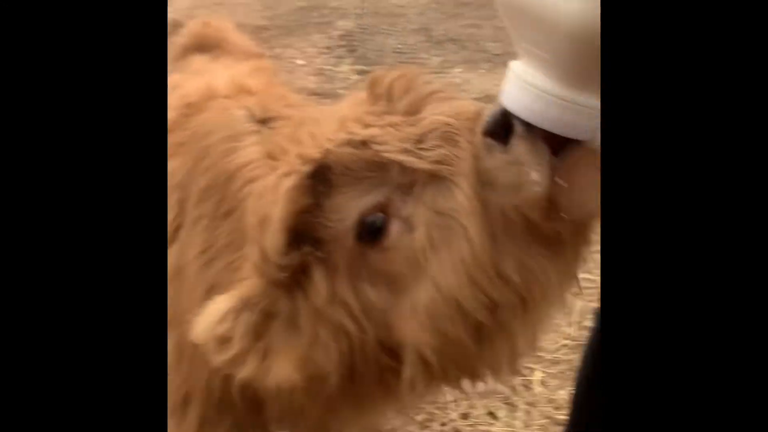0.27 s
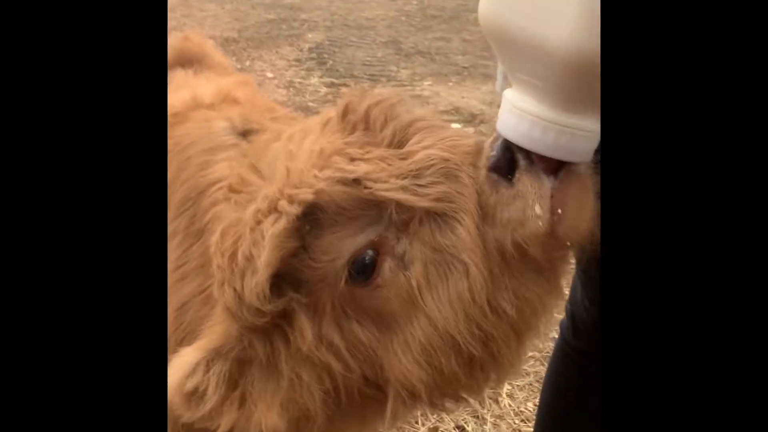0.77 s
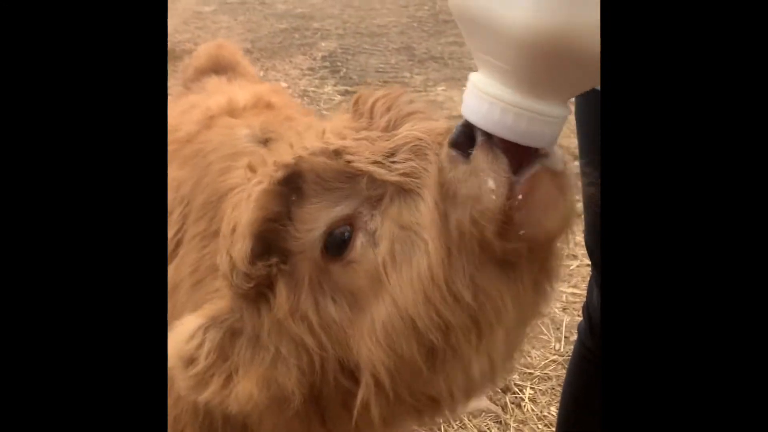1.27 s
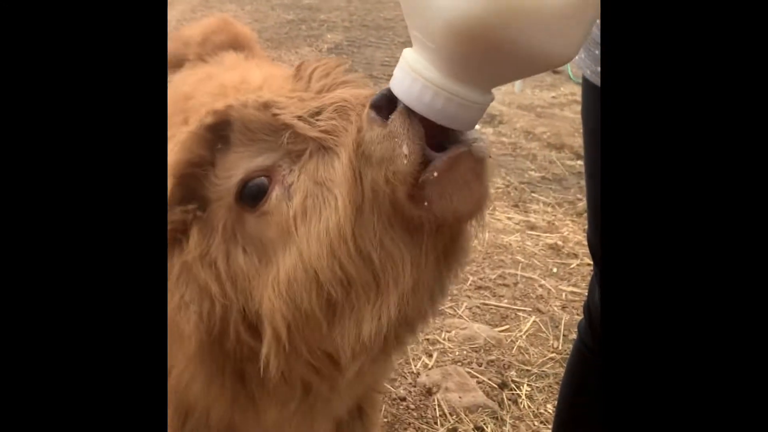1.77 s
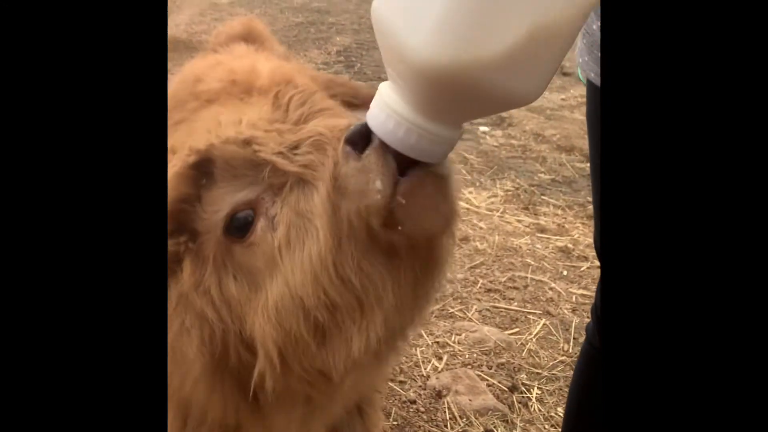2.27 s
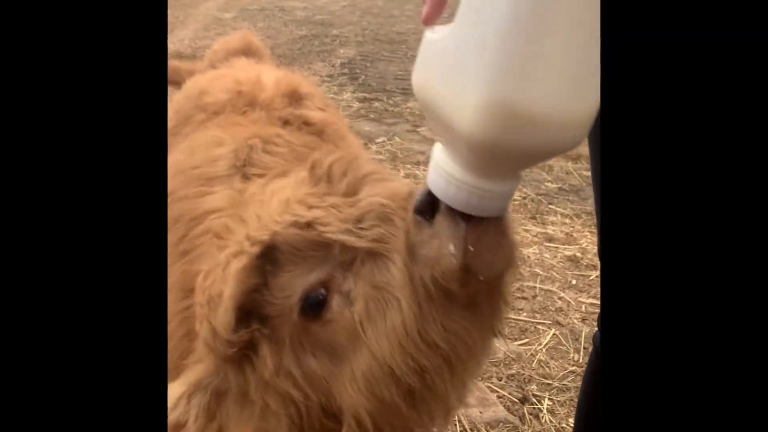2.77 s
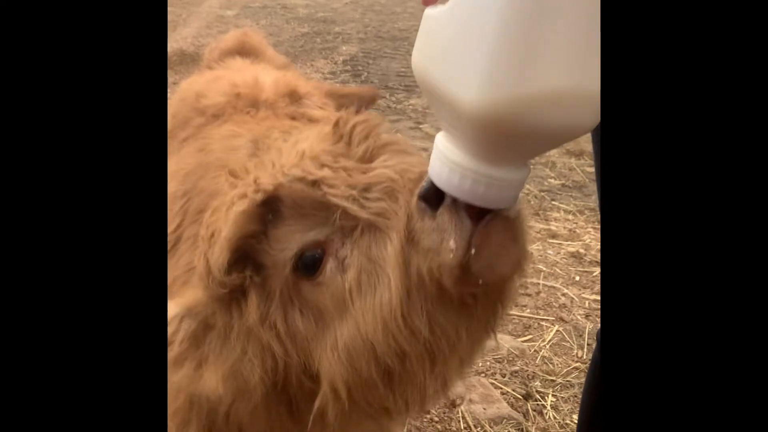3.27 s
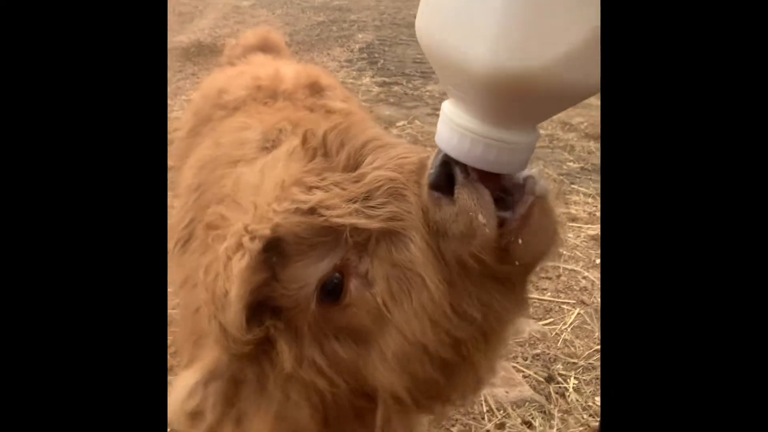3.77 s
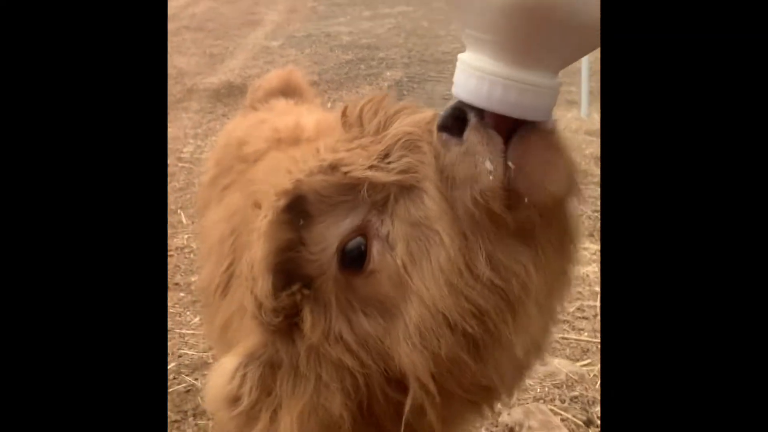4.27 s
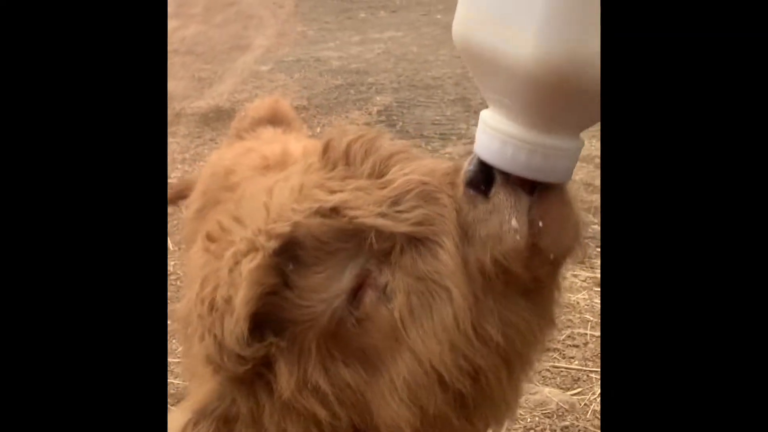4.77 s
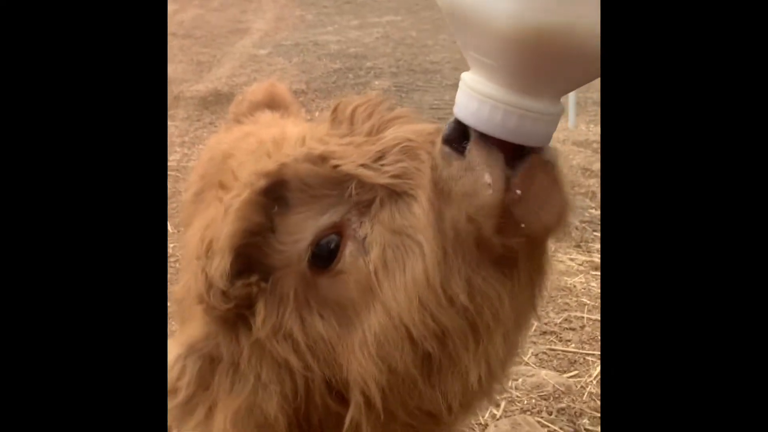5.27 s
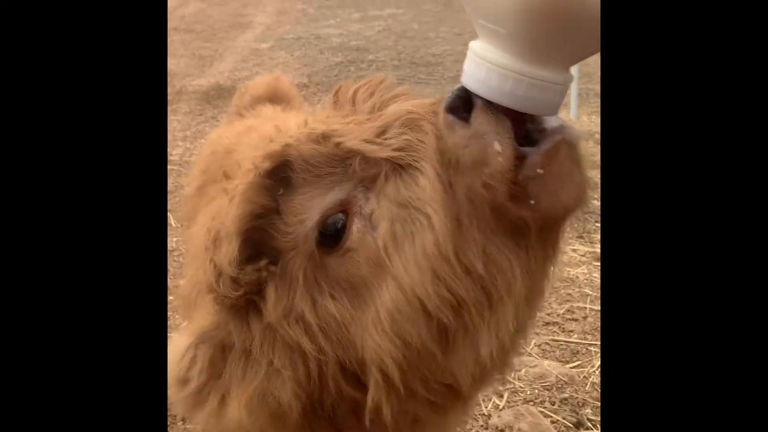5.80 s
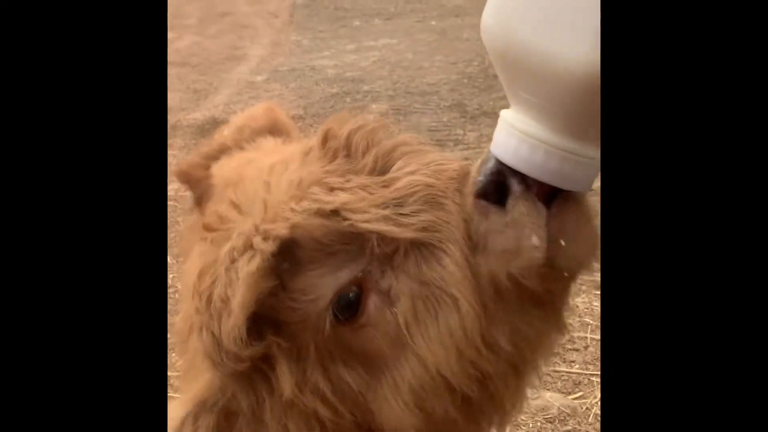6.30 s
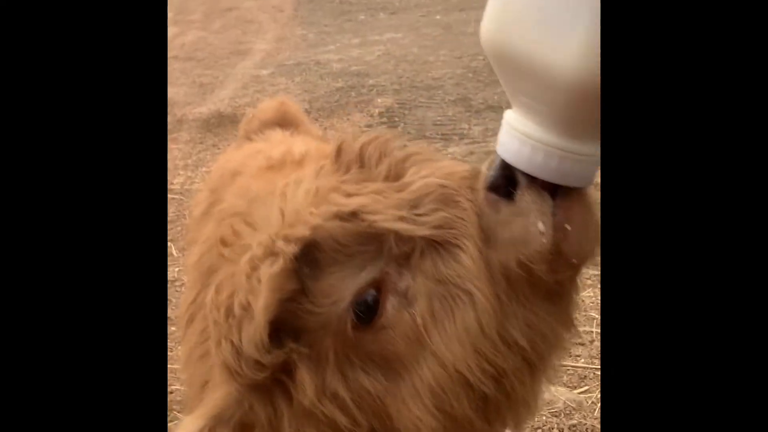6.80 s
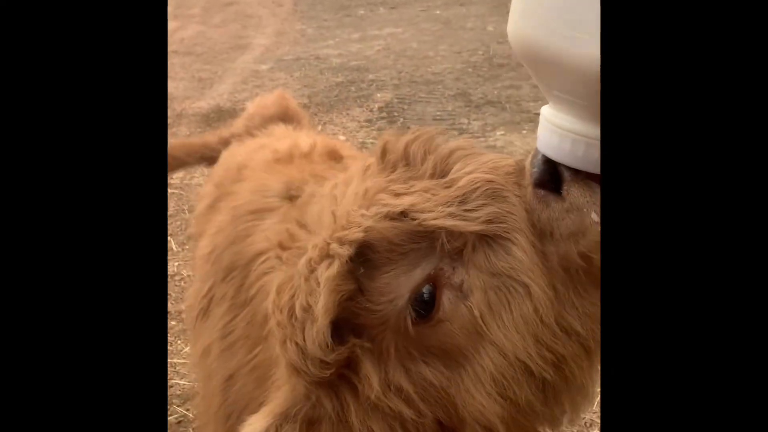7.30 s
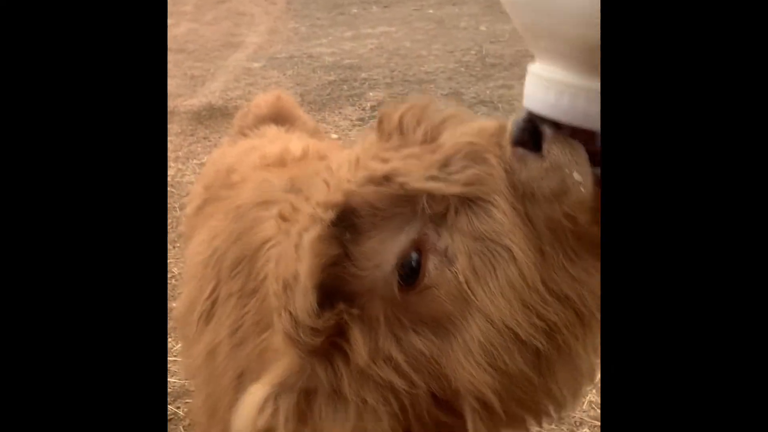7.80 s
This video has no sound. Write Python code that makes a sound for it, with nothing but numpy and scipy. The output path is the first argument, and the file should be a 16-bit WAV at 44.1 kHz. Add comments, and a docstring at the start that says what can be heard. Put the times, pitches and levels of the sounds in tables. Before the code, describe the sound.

A calf sucks milk from a bottle close up, with irregular frothy slurps, fizzing hiss, wet smacks and sharp clicks over faint outdoor wind.

```python
"""Slurps come first: a calf sucks milk from a bottle in an outdoor pen, close to the microphone.
Each suck drags air and froth past the rubber teat: popping froth, fizzing bubbles and a low burble.
Lip gaps whistle as gliding bands of hiss; the seal spits, wet lips smack and films snap as bursts of
froth; milk glugs as falling tones. Wind, open air and a faint hum are filtered noise.
Drifting echoes and a phase-scrambled part join the direct sound at two microphone ports."""
import sys
import numpy as np
from scipy import signal
from scipy.fft import rfft, irfft
from scipy.io import wavfile
from scipy.ndimage import uniform_filter1d

SR = 44100
rng = np.random.default_rng(int(sys.argv[2]) if len(sys.argv) > 2 else 0)


def int16_out(signal):
    """Quantize to a 16-bit WAV file."""
    q = np.round(np.clip(np.atleast_2d(signal).T, -1, 1) * 32767)
    wavfile.write(sys.argv[1], SR, q.astype(np.int16))


N = 355005
TIME = np.arange(N) / SR
TICKS = np.arange(0, N + 128, 128) / SR  # coarse times for slow controls
BINS = np.fft.rfftfreq(N, 1 / SR)


def gain_of(db):
    """Decibels to an amplitude factor."""
    return 10 ** (np.asarray(db) / 20)


def evened(x):
    """Scales to an rms of one."""
    return x / np.sqrt(np.mean(x ** 2) + 1e-20)


def read(points, hz, axis=1):
    """Reads one column of a table on a log-frequency axis."""
    points = np.asarray(points, float)
    return np.interp(np.log(hz + 1), np.log(points[:, 0] + 1), points[:, axis])


def colour_kept(x, points):
    """Filters x by a spectrum without rescaling it."""
    return irfft(rfft(x) * gain_of(read(points, BINS)), N)


def colour(x, points):
    """Filters x by a spectrum; rms one."""
    return evened(colour_kept(x, points))


def bell(hz, centre_hz, octaves):
    """A hump of height one on a log-frequency axis."""
    return np.exp(-.5 * (np.log2((hz + 1) / centre_hz) / octaves) ** 2)


def band_noise(centre_hz, octaves):
    """Noise shaped by a bell; at low rates, a random wander."""
    return irfft(rfft(rng.standard_normal(N)) * bell(BINS, centre_hz, octaves), N)


def add(mix, s, sound):
    """Mixes a sound in at time s."""
    part = mix[max(round(s * SR), 0):][:len(sound)]
    part += sound[:len(part)]


def froth(size, per_s, spread_db, air):
    """Bursting films: sparse clicks of uneven strength, with a share of smooth rushing air."""
    strength = gain_of(spread_db * np.minimum(rng.exponential(1, size), 4))
    sign = rng.choice([-1, 1], size)
    clicks = strength * sign * (rng.random(size) < per_s / SR)
    return evened(evened(clicks) + air * rng.standard_normal(size))


def bubbles(low_hz, high_hz, per_s, ring_cycles, count=20):
    """Bubbles of many sizes, each ringing for a few cycles at its own pitch."""
    t, out = np.arange(2048) / SR, np.zeros(N)
    for hz in np.geomspace(low_hz, high_hz, count):
        cycles = hz * t
        onset = 1 - np.exp(-cycles / 0.36)
        ring_down = np.sin(2 * np.pi * cycles) * np.exp(-cycles / ring_cycles) * onset
        chance = rng.random(N) * SR * count / per_s
        # the rarer a bubble, the stronger, up to a ceiling
        births = np.where(chance < 1, np.maximum(chance, .05) ** -.4, 0)
        out += signal.oaconvolve(births, ring_down)[:N]
    return evened(out)


def burst(length_s, db, centre_hz, octaves, release_s=0.011, attack_s=0.00015, droop=0.47):
    """A short dense crackle of froth, pitched by the size of the opening."""
    size = 8192
    t, hz = np.arange(size) / SR, np.fft.rfftfreq(size, 1 / SR)
    release = np.exp(-np.maximum(t - length_s, 0) / min(release_s, length_s))
    shape = (1 - np.exp(-t / attack_s)) * release
    shape *= np.exp(-droop * t / length_s)  # the pressure behind it drains away
    shape /= np.sqrt(np.mean(shape[t <= length_s] ** 2))
    spray = froth(size, per_s=2100, spread_db=1.5, air=0.65)
    crackle = shape * irfft(rfft(spray) * bell(hz, centre_hz, octaves))
    return gain_of(db) * crackle * np.linalg.norm(shape) / np.linalg.norm(crackle)


def sputter(rate_hz, depth_db):
    """Uneven flow: a gain that wanders at random around the given rate."""
    wander = evened(band_noise(rate_hz, octaves=0.79))
    return evened(gain_of(depth_db * np.clip(wander, -2, 2)))


def films(shape, bands_size, frames_size):
    """Wet films stretch and break, so the colour of the mouth flickers in small patches."""
    patches = uniform_filter1d(rng.standard_normal(shape), bands_size, axis=0)
    return evened(uniform_filter1d(patches, frames_size, axis=1))


def cavity(x, shape_db):
    """Passes x through a moving filter of unit power, given as dB over (Hz, s)."""
    hz, t, z = signal.stft(x, SR, nperseg=256, noverlap=192)
    gain = gain_of(shape_db(hz[:, None], t))
    gain /= np.sqrt(np.mean(gain ** 2, axis=0))
    return signal.istft(z * gain, SR, nperseg=256, noverlap=192)[1][:N]


# sucks, all levels relative: start/s, length/s, rise/s, slurp level/dB, fizz level/dB, swell over stroke/dB,
# leak afterwards/dB, first mouth resonance f/Hz, last mouth resonance f/Hz, flutter depth/dB,
# fizz tilt/(dB/octave), burble level/dB
SUCK_STROKES = [(0.0, 0.38, 0.4, -34.5, -38.5, -20, 2, 2920, 2600, -0.5, 0.5, -48),
                (0.388, 0.25, 0.06, -42, -42.5, 1, -20, 2430, 2550, 0.5, 8.5, -46.5),
                (0.747, 0.1, 0.076, -56, -59, 0, -16, 3000, 3080, 2.5, 5, -55.5),
                (0.848, 0.28, 0.13, -36, -39, -14.5, 0, 3000, 2450, 3, 12, -49),
                (1.213, 0.32, 0.044, -45, -46.5, 6.5, -0.5, 2870, 2970, -0.5, -2, -52.5),
                (1.523, 0.36, 0.11, -40, -42.5, 9, -4, 2620, 2085, 3.5, -8.5, -48.5),
                (2.008, 0.26, 0.069, -48.5, -46.5, 16.5, -3.5, 2860, 3000, 3, -16, -53.5),
                (2.471, 0.21, 0.11, -42.5, -43, -12, -36, 4160, 3070, 3, -20.5, -52.5),
                (2.846, 0.16, 0.026, -56, -54, 16, -25, 2950, 2740, 2, -12, -67),
                (3.02, 0.067, .03, -50.5, -50, 9.5, -1, 3150, 3700, 2.5, -3.5, -49.5),
                (3.167, 0.31, 0.11, -43, -43, 6.5, -3, 2320, 2260, 2.5, -7.5, -48),
                (3.53, 0.38, 0.019, -55, -50.5, 6, 0, 2700, 2900, 3, -13.5, -57),
                (3.944, 0.18, 0.066, -49, -43, 10, -30, 3100, 3120, 3.5, -24.5, -54),
                (4.101, 0.18, 0.039, -35.5, -43, 3, -0.5, 3200, 2700, 3.5, -11.5, -47),
                (4.398, 0.25, 0.07, -37.5, -40.5, -5, -2.5, 2280, 2430, 3, -8, -45.5),
                (4.677, 0.18, 0.037, -54.5, -49, -2, -11, 3300, 3360, 2.5, -12.5, -53),
                (4.827, 0.26, 0.18, -34, -39.5, -5, 0, 3970, 2930, 3.5, -13.5, -47),
                (5.152, 0.33, 0.083, -40.5, -43, 6.5, -1, 1850, 2660, 1.5, -12, -47),
                (5.554, 0.29, 0.12, -39, -41.5, 2.5, -17, 3040, 2350, 2, -10.5, -48.5),
                (6.043, 0.1, 0.034, -55, -54.5, 14, 0, 2900, 3170, 4, -10, -57),
                (6.159, 0.45, 0.084, -44.5, -43, 0.5, 0, 3300, 3440, -0.5, -6, -54.5),
                (6.484, 0.22, 0.05, -37.5, -43, -4, -3, 3750, 3470, 6.5, -18, -45),
                (6.809, 0.27, 0.21, -40.5, -40.5, 0.5, -0.5, 3280, 3380, 2.5, -7.5, -47.5),
                (7.237, 0.42, 0.13, -42, -41.5, -9.5, 0, 3300, 3470, 3, -4.5, -51),
                (7.619, 0.25, 0.17, -37, -38.5, -3.5, -1, 2900, 2940, 3, -2.5, -45.5),
                (7.94, 0.11, 0.03, -45, -50, -3, 0, 3300, 3200, 3, -2, -58)]
SUCK_FIELDS = ("start_s length_s rise_s slurp_db fizz_db swell_db leak_db "
               "first_hz last_hz flutter_db tilt_db burble_db").split()


def column(name):
    """One named column of the sucks."""
    return np.transpose(SUCK_STROKES)[SUCK_FIELDS.index(name)]


def strokes(t, leak_power):
    """Per suck: progress 0-1, attack 0-1, release to a settling leak, and swell in dB."""
    fields = ("start_s", "length_s", "rise_s", "swell_db", "leak_db")
    start, length, rise, swell_db, leak_db = (column(name)[:, None] for name in fields)
    progress = np.clip((t - start) / length, 0, 1)
    after = np.maximum(t - start - length, 0)
    leak = gain_of(leak_power * np.minimum(leak_db, 0))
    # the flow stops quickly; the leak at the lips dies slowly
    release_s, settle_s = 0.021, 0.21
    release = (1 - leak) * np.exp(-after / release_s) + leak * np.exp(-after / settle_s)
    return progress, np.clip((t - start) / rise, 0, 1), release, swell_db * (progress - .5)


def loudness(levels_db, seep_db, attack_power, leak_power, swell_share):
    """Gain of one layer: all sucks at their own levels, over milk seeping steadily."""
    _, attack, release, swell_db = strokes(TICKS, leak_power)
    each = gain_of(levels_db[:, None] + swell_share * swell_db) * attack ** attack_power * release
    return np.interp(TIME, TICKS, np.sqrt((each ** 2).sum(0) + gain_of(seep_db) ** 2))


def posture(t, first, last):
    """A mouth setting slides from first to last in each suck; the next suck takes over."""
    progress, attack, release, _ = strokes(t, leak_power=1)
    weight = (attack * release) ** 2 + 1e-9
    value = first[:, None] + (last - first)[:, None] * progress
    return (weight * value).sum(0) / weight.sum(0)


def flutter(rate_hz=33.02, jitter=0.9):
    """The teat flutters, so milk comes in quick uneven spurts, as deep as each suck makes them."""
    wander = evened(band_noise(16.1, octaves=0.88))
    turns = np.cumsum(rate_hz * (1 + jitter * wander)) / SR
    depth = column("flutter_db")
    depth_db = np.interp(TIME, TICKS, posture(TICKS, depth, depth))
    return evened(gain_of(depth_db * np.cos(2 * np.pi * turns)))


# slurp colour: f/Hz, relative level/dB
SLURP_COLOUR = [(1100, -9), (1550, 5), (1850, 6), (2300, 4), (2650, -4), (3200, 7), (3700, 6), (4200, -31),
                (4700, -37), (5500, -8)]


def slurp(flow, spurts, bubbly=0.26, films_db=1.7):
    """Froth and small bubbles pop in the mouth, whose resonance slides as the tongue strips the teat."""
    def mouth(hz, t):
        flicker_db = films_db * films((len(hz), len(t)), bands_size=2, frames_size=9)
        resonance_hz = posture(t, column("first_hz"), column("last_hz"))
        return read(SLURP_COLOUR, hz) + 12 * bell(hz, resonance_hz, octaves=0.3) + flicker_db
    pops = froth(N, per_s=1100, spread_db=2.7, air=0.5)
    pops = pops + bubbly * bubbles(1656, 3962, per_s=350, ring_cycles=26)
    level = loudness(column("slurp_db"), seep_db=-69, attack_power=1.3, leak_power=4.3, swell_share=1.0)
    uneven = flow * spurts * sputter(rate_hz=160, depth_db=1.5)
    return evened(cavity(pops, mouth)) * gain_of(-4.5) * level * uneven


# fizz colour: f/Hz, relative level/dB
FIZZ_COLOUR = [(2800, -24), (4200, -72), (4800, 2.5), (5500, -2), (6300, -2), (7200, 1), (8400, 2),
               (10000, 3.5), (11000, 4.5), (12000, 3), (13000, 4.5), (14000, 5), (15700, -7.5)]
# narrow hollow in the hiss, drifting as the head moves: t/s, f/Hz
HISS_HOLLOW = [(0.5, 6300), (1.3, 7140), (1.7, 7900), (2.1, 8200), (2.8, 7000), (3.6, 7040), (4.1, 6600),
               (4.75, 7700), (5.6, 6700), (6.4, 7800), (7.4, 7640), (8, 7250)]
# boost of the highest hiss: t/s, relative level/dB
TOP_HISS_LEVEL = [(0, 3.5), (1, -5), (1.7, 7), (2.3, 7), (3, -4.5), (3.7, 11.5), (4.6, 7.5), (5.5, -5),
                  (6.2, -9), (8, -16)]


def fizz(flow, bubbly=0.21, films_db=1.9, hollow_db=-11, hollow_octaves=0.026):
    """Tiny bubbles ring and air hisses through the gap between lip and teat, in little clumps."""
    def gap(hz, t):
        tilt = column("tilt_db")
        tilt_db = posture(t, tilt, tilt) * np.log2(np.maximum(hz, 4000) / 9000)
        hollow_hz = np.interp(t, *np.transpose(HISS_HOLLOW))
        notch_db = hollow_db * bell(hz, hollow_hz, hollow_octaves)
        top_db = np.interp(t, *np.transpose(TOP_HISS_LEVEL)) * bell(hz, 14500, octaves=0.28)
        flicker_db = films_db * films((len(hz), len(t)), bands_size=4, frames_size=14)
        return read(FIZZ_COLOUR, hz) + tilt_db + top_db + notch_db + flicker_db
    spray = froth(N, per_s=1500, spread_db=5.5, air=0.95)
    spray = spray + bubbly * bubbles(5733, 12100, per_s=600, ring_cycles=30)
    level = loudness(column("fizz_db"), seep_db=-60.5, attack_power=0.49, leak_power=0.62, swell_share=0.45)
    uneven = evened(flow ** 0.5) * sputter(rate_hz=170, depth_db=0.5)
    return cavity(evened(spray), gap) * gain_of(-2.05) * level * uneven


# burble colour: f/Hz, relative level/dB
BURBLE_COLOUR = [(200, 0), (370, -14), (500, -9.5), (700, -1.5), (950, 1), (1200, -1), (1500, -3.5),
                 (2200, -35)]


def burble(flow, frothy=0.52):
    """Larger bubbles ring deep in the mouth among bursting froth, in uneven clumps."""
    level = loudness(column("burble_db"), seep_db=-54, attack_power=0.46, leak_power=10.5, swell_share=1.0)
    clumps = sputter(rate_hz=18.4, depth_db=1.9)
    pops = froth(N, per_s=450, spread_db=2.5, air=0.2)
    pops = evened(irfft(rfft(pops) * bell(BINS, 920, octaves=0.85), N))
    wet = bubbles(383.0, 1457, per_s=800, ring_cycles=9.8) + frothy * pops
    return colour(wet, BURBLE_COLOUR) * gain_of(-2.0) * level * clumps * flow


# wind rumble colour: f/Hz, relative level/dB
WIND_RUMBLE = [(15, -66), (30, -17), (48, -7.5), (66, 2.5), (100, -6.5), (145, -5), (180, -12),
               (260, -15.5), (450, -32.5), (900, -62)]
# gusts that buffet the microphone: t/s, length/s, relative level/dB
WIND_GUSTS = [(0.058, 0.16, -42), (2.367, 0.044, -29), (2.405, 0.068, -33.5), (2.456, 0.13, -42),
              (5.306, 0.032, -44), (7.974, 0.062, -43.5)]


def wind():
    """Low, lumpy turbulence at the microphone, with brief stronger gusts."""
    rumble = colour(rng.standard_normal(N), WIND_RUMBLE)
    out = rumble * gain_of(-51) * sputter(rate_hz=5.2, depth_db=2.5)
    buffet = band_noise(64, octaves=0.71)
    for s, length_s, db in WIND_GUSTS:
        gust = buffet[(TIME >= s) & (TIME < s + length_s)]
        add(out, s, gain_of(db) * evened(gust) * signal.windows.tukey(len(gust), .3))
    return out


# open-air colour: f/Hz, relative level/dB
OPEN_AIR = [(25, -21), (100, -13), (280, 2), (370, 13), (450, -19), (800, -27), (1200, -21), (1550, -7),
            (3000, -16.5), (4000, -15), (5200, -28), (7000, -38), (10500, -4.5), (16000, -13)]
# faint, far, wavering hum: f/Hz, width/octaves, relative level/dB
FAR_HUM = [(372.3, 0.024, -66.5), (1270, 0.029, -73)]


def outdoors():
    """The wind, the faint wash of the open pen and a far hum of narrow noise bands."""
    noise = rfft(rng.standard_normal(N))
    hum = np.zeros(N)
    for hz, octaves, db in FAR_HUM:
        hum += gain_of(db) * evened(irfft(noise * bell(BINS, hz, octaves), N))
    return wind() + hum + gain_of(-59.5) * colour(rng.standard_normal(N), OPEN_AIR)


# breathy whistles at the lip gap: t/s, length/s, relative level/dB, first f/Hz, last f/Hz
LIP_WHISTLES = [(0.02, 0.086, -64, 8140, 10600), (0.222, 0.18, -49.5, 10700, 8460),
                (0.396, 0.32, -52, 8060, 8260), (0.814, 0.078, -57, 8000, 10400),
                (1.056, 0.24, -50, 10500, 9200), (2.05, 0.2, -51, 7000, 9600),
                (4.27, 0.25, -50.5, 11400, 9950), (4.806, 0.083, -52.5, 7260, 11100),
                (5.241, 0.18, -50, 7600, 9900), (5.48, 0.13, -55, 7800, 7370),
                (6.435, 0.32, -45.5, 8680, 8950)]


def whistles(width_hz=520):
    """A narrow band of hiss glides as the lip gap narrows or widens, swelling and fading."""
    out = np.zeros(N)
    lowpass = 1 / (1 + (BINS / width_hz) ** 4) ** .5
    air = evened(irfft(rfft(rng.standard_normal((2, N))) * lowpass, N))
    for s, length_s, db, first_hz, last_hz in LIP_WHISTLES:
        a, b = air[:, (TIME >= s) & (TIME < s + length_s)]
        turn = 2 * np.pi * np.cumsum(np.geomspace(first_hz, last_hz, len(a))) / SR
        hiss = a * np.cos(turn) + b * np.sin(turn)
        add(out, s, gain_of(db) * signal.windows.tukey(len(a), .7) * hiss)
    return out


# hollow notes of mouth and bottle: f/Hz, relative level/dB, t60/s
RING_NOTES = [(947, -3, 0.09), (1370, 1, 0.097), (2350, 0, 0.11), (2360, -13, 0.044), (2534, -14, 0.05),
              (2840, -2, 0.081), (3220, -10, 0.073), (3560, -2, 0.088), (3830, -10, 0.099)]


def ring():
    """The hollow notes, struck once and dying away."""
    t, out = np.arange(8192) / SR, np.zeros(8192)
    for hz, db, t60_s in RING_NOTES:
        out += gain_of(db - 60 * t / t60_s) * np.sin(2 * np.pi * (hz * t + rng.random()))
    return out


# seal bursts on the teat, levels relative: t/s, length/s, spray level/dB, snap delay/s, snap level/dB,
# mouth level/dB, throat level/dB, ring level/dB
SEAL_SPITS = [(0.2155, 0.0084, -28, 0.0012, -36, -42, -51, -52),
              (1.41, 0.01, -29.5, 0.0043, -18, -33, -43.5, -39),
              (2.996, 0.025, -22, 0.017, -13, -31, -31, -24)]


def spits(mouth_lag_s=0.001933, throat_lag_s=0.009, snap_s=0.0008, throat_s=0.03):
    """The seal bursts: overlapping spray, mouth and throat bursts, and a sharp snap that rings notes."""
    out = np.zeros(N)
    for s, length_s, spray_db, snap_delay_s, snap_db, mouth_db, throat_db, ring_db in SEAL_SPITS:
        spray = burst(length_s, spray_db, centre_hz=11030, octaves=0.68, attack_s=0.00086, droop=0.55)
        mouth = burst(length_s, mouth_db, centre_hz=2650, octaves=0.46, attack_s=0.00065, droop=0.099)
        add(out, s, spray)
        add(out, s + snap_delay_s, burst(snap_s, snap_db, centre_hz=9800, octaves=0.26))
        add(out, s + snap_delay_s, gain_of(ring_db) * ring())
        add(out, s + mouth_lag_s, mouth)
        add(out, s + throat_lag_s, burst(throat_s, throat_db, centre_hz=1080, octaves=0.68))
    return out


# wet smacks of lips and tongue: t/s, length/s, relative level/dB, centre f/Hz, width/octaves
LIP_SMACKS = [(0.237, 0.072, -45, 2260, 0.27), (0.242, 0.029, -44, 894, 0.06),
              (0.652, 0.0076, -44, 8400, 1.2), (0.686, 0.0083, -48, 1460, 0.75),
              (1.2195, 0.014, -42, 594, 1), (1.448, 0.013, -47, 9730, 0.27),
              (2.271, 0.01, -36.5, 1680, 0.23), (3.01, 0.0071, -29, 2650, 0.28),
              (3.027, 0.012, -38, 1180, 1.5), (3.071, 0.016, -45, 1430, 1.1),
              (3.573, 0.019, -37, 670, 1.04), (3.765, 0.011, -43.5, 2630, 0.76),
              (3.779, 0.0087, -43, 810, 0.53), (3.782, 0.0091, -40.5, 2590, 0.56),
              (3.828, 0.0046, -38.5, 2330, 0.69), (3.844, 0.007, -36, 1370, 1.46),
              (4.047, 0.018, -43, 890, 0.19), (4.244, 0.008, -41.5, 8430, 0.81),
              (4.653, 0.013, -42, 740, 0.53), (4.824, 0.0029, -46.5, 2360, 0.16),
              (4.863, 0.0029, -41, 900, 0.91), (4.904, 0.008, -36.5, 1190, 0.72),
              (4.925, 0.024, -42.5, 3730, 0.1), (5.376, 0.021, -33, 1940, 0.35),
              (5.3772, 0.022, -37.5, 8000, 0.98), (5.688, 0.0064, -35.5, 1070, 0.96),
              (5.876, 0.018, -45.5, 2090, 0.27), (5.978, 0.0027, -39.5, 2000, 1.6),
              (6.243, 0.0095, -46, 800, 0.6), (6.2735, 0.0084, -37, 1090, 0.46),
              (6.534, 0.039, -36, 1870, 0.37), (6.6, 0.0056, -42, 764, 0.13),
              (6.703, 0.0095, -41, 2140, 2.4), (7.843, 0.014, -44, 2170, 0.33)]
# milk films snapping between lip and teat: t/s, relative level/dB, centre f/Hz
FILM_SNAPS = [(0.6833, -46, 9000), (0.7092, -44, 9500), (0.7225, -47, 9000), (0.7385, -59, 9000),
              (0.7516, -43, 9000), (0.8175, -45, 8500), (0.848, -43, 8500), (1.4545, -40, 9600),
              (1.463, -40, 9500), (1.5295, -41, 9500), (2.0604, -41, 9000), (2.6725, -41, 9700),
              (2.989, -40, 2600), (3.0845, -38, 10500), (4.1554, -42, 3100), (4.2008, -41, 2700),
              (4.2145, -35, 2400), (4.346, -33.5, 2600), (4.4051, -37, 2660), (4.4385, -38, 2600),
              (4.4926, -50, 3200), (5.6814, -37, 8500), (5.7587, -33, 2600), (6.053, -38, 9200),
              (6.1985, -35, 8500), (6.6322, -41, 2600), (6.8814, -45, 8500), (7.047, -33.5, 8500),
              (7.3361, -43, 8500), (7.7983, -38, 8660), (7.813, -31, 8500), (7.8494, -31, 8000)]


def smacks():
    """Lips and tongue part: one burst of froth each; a single film gives just a snap."""
    out = np.zeros(N)
    for s, length_s, db, centre_hz, octaves in LIP_SMACKS:
        add(out, s, burst(length_s, db, centre_hz, octaves))
    for s, db, centre_hz in FILM_SNAPS:
        add(out, s, burst(0.001, db, centre_hz, octaves=0.5))
    return out


def pocket(db, fall_s, final_hz, decay_s, extra_hz=2900, steepness=2.15, swell_s=0.003):
    """A pocket of air opens in the milk: its tone drops as it swells, and soon dies."""
    t = np.arange(4096) / SR
    hz = final_hz + extra_hz / (1 + (t / fall_s) ** steepness)
    size = np.minimum(t / swell_s, 1) * np.exp(-np.maximum(t - swell_s, 0) / decay_s)
    return gain_of(db) * size * np.sin(2 * np.pi * np.cumsum(hz) / SR)


# glugs, before the throat: t/s, relative peak level/dB, fall/s, ring decay/s
MILK_GLUGS = [(4.7108, -31.5, 0.0014, 0.0029), (4.7375, -33, 0.00115, 0.0035),
              (5.979, -31.5, 0.00147, 0.0049), (5.9968, -34, 0.0016, 0.0083), (6.0157, -36, 0.00144, 0.005),
              (6.0725, -42, 0.0012, 0.003), (6.093, -36.5, 0.0013, 0.0057), (6.1165, -36.5, 0.0013, 0.0057),
              (6.137, -39, 0.00112, 0.004), (6.211, -38, 0.00132, 0.005), (6.2235, -39, 0.00096, 0.0035),
              (7.5503, -33, 0.00115, 0.0023), (7.578, -35, 0.00104, 0.002),
              (7.5962, -33.5, 0.00102, 0.0022), (7.6102, -40, 0.00108, 0.0017), (7.627, -40, 0.0008, 0.002),
              (7.9381, -31.5, 0.00091, 0.0015), (7.9459, -32, 0.00085, 0.0022),
              (7.969, -30.5, 0.00082, 0.0015), (7.9805, -33, 0.0008, 0.0016), (7.99, -49, 0.0008, 0.0016)]
# large bubbles with a hollow note, before the throat: t/s, relative peak level/dB
HOLLOW_BLOOPS = [(1.2186, -36), (3.022, -36), (3.575, -43.5)]
# throat through which both are heard: f/Hz, gain/dB
THROAT_COLOUR = [(150, 4), (300, -0.5), (450, -0.5), (620, 5), (850, -11), (1200, 11.5), (1600, 5.5),
                 (3000, -4)]


def glugs(drop_power=0.39, pocket_fall_s=0.0014, pocket_hz=185):
    """Runs of short glugs, ending lower the slower they fall, and a few hollow bloops."""
    out = np.zeros(N)
    for s, db, fall_s, ring_s in MILK_GLUGS:
        final_hz = pocket_hz * (pocket_fall_s / fall_s) ** drop_power
        add(out, s, pocket(db, fall_s, final_hz, ring_s))
    for s, db in HOLLOW_BLOOPS:
        add(out, s, pocket(db, fall_s=0.001056, final_hz=270, decay_s=0.024))
    return colour_kept(out, THROAT_COLOUR)


# near reflections, likely bottle, ground and legs: delay/s, relative level/dB, rms drift/s
NEAR_ECHOES = [(.0011, -12, 0.00013), (.00375, -19, 0.00015), (.0062, -11.5, 0.0003)]
# their colour: f/Hz, gain/dB
REFLECTION_COLOUR = [(300, -29.5), (2000, -4), (4000, -1), (8000, -3), (15000, -12)]


def echoes(x, rate_hz=1.346):
    """Thin, bright early reflections whose paths drift as the calf moves its head."""
    thin, out = colour_kept(x, REFLECTION_COLOUR), np.zeros(N)
    for delay_s, db, drift_s in NEAR_ECHOES:
        drift = evened(band_noise(rate_hz, octaves=0.483))
        out += gain_of(db) * np.interp(TIME - delay_s - drift_s * drift, TIME, thin, left=0)
    return out


def scatter(x):
    """Reflections from the moving head and bottle keep the loudness but scramble the phase."""
    z = signal.stft(x, SR, nperseg=128)[2]
    turned = z * np.exp(2j * np.pi * rng.random(z.shape))
    mixed = signal.istft(turned, SR, nperseg=128)[1][:N]
    return evened(mixed) * np.std(x)


# microphone ports: f/Hz, phase of left against right/rad, likeness/(0-1), left minus right/dB
MIC_PORTS = [(30, 0, .96, 0), (110, -.05, .96, .5), (350, -.45, .84, 3), (650, -1.65, .88, 0),
             (950, -1.5, .96, -2.5), (1550, -3.05, .98, 0), (1950, -4.6, .6, -5), (2350, -5.1, .5, -6),
             (2750, -7, .55, 0), (3250, -7.6, .75, -7), (3900, -9.3, .996, 0), (4900, -9.5, .996, 0),
             (6200, -10.7, .86, 0), (8200, -12.55, .96, 0), (10500, -13.9, .87, 0), (12600, -15.65, .99, 0),
             (13500, -15.8, .99, 0), (15700, -18.3, .65, 0)]


def ports(direct, diffuse):
    """Sound from the right reaches the left port later, mixed there with a diffuse part."""
    phase, same, balance_db = (read(MIC_PORTS, BINS, axis=k) for k in (1, 2, 3))
    same, right, balance = np.clip(same, 0, 1), rfft(direct), gain_of(balance_db)
    shared = same * right * np.exp(1j * phase)
    left = (shared + np.sqrt(1 - same ** 2) * rfft(diffuse)) * balance
    return irfft(np.array([left, right]) / np.sqrt((1 + balance ** 2) / 2), N)


def scene():
    """The calf's mouth and its reflections over the wind and the open air."""
    flow, spurts = sputter(rate_hz=11.8, depth_db=0.5), flutter()
    sucking = slurp(flow, spurts) + fizz(flow * spurts) + burble(flow * spurts)
    mouth = sucking + whistles() + spits() + smacks() + glugs()
    diffuse = gain_of(-8.0) * scatter(mouth) + gain_of(11.5) * echoes(mouth)
    direct = gain_of(-0.75) * (mouth + echoes(mouth))
    return ports(direct + outdoors(), diffuse + outdoors())


def record(dry, edge_hz=15800):
    """Band limit: a steep linear-phase low-pass on both channels."""
    taps = signal.firwin(511, edge_hz, window=("kaiser", 9), fs=SR)
    return signal.oaconvolve(dry, taps[None], "same", axes=1)


dry = scene()
out = record(dry)
int16_out(out)
```